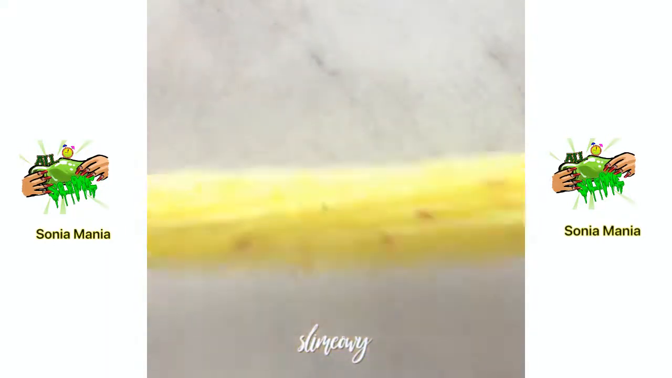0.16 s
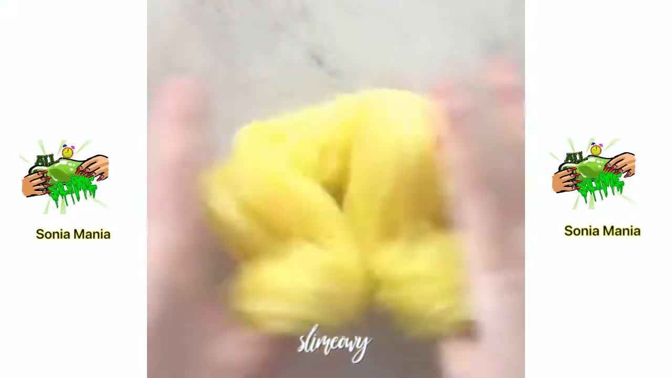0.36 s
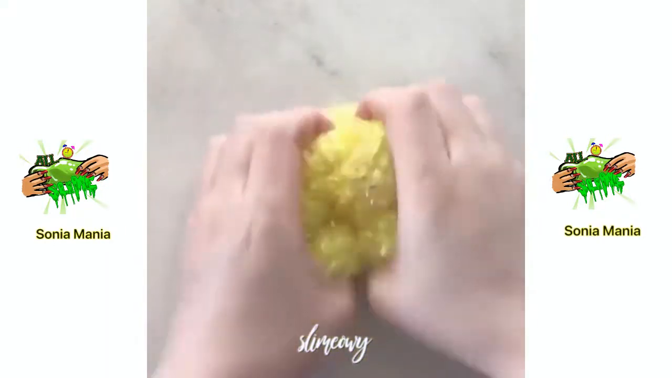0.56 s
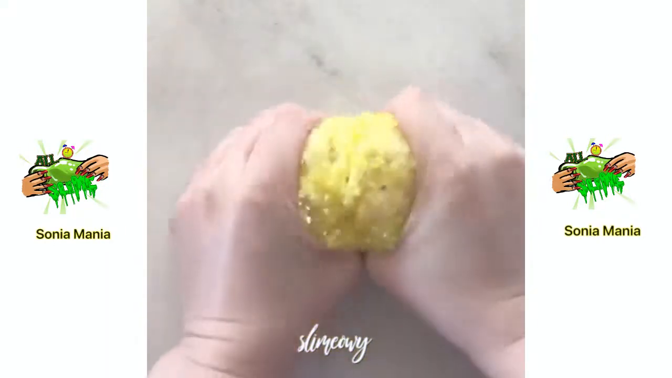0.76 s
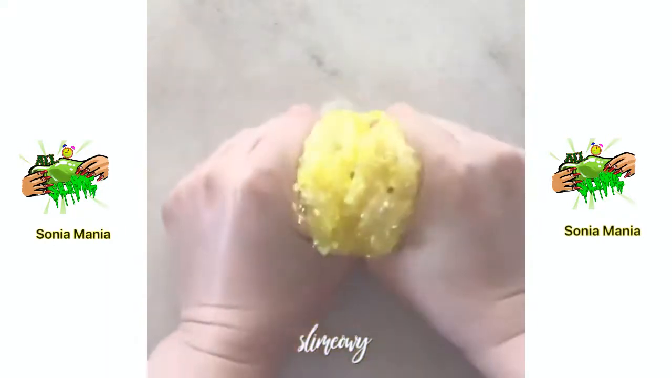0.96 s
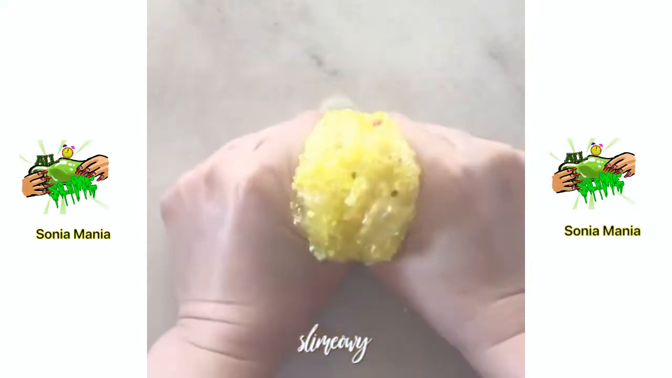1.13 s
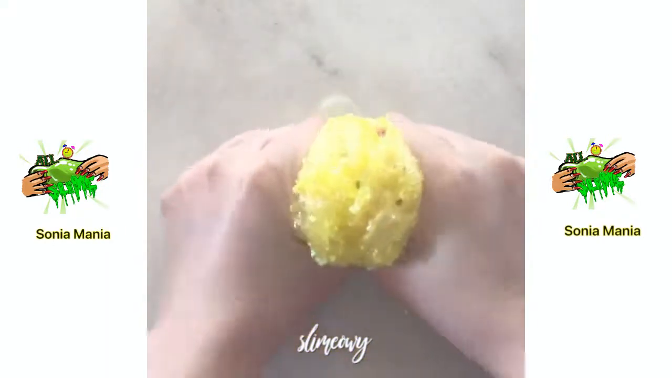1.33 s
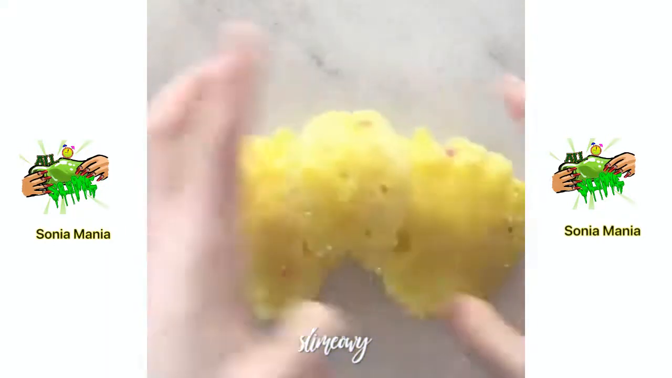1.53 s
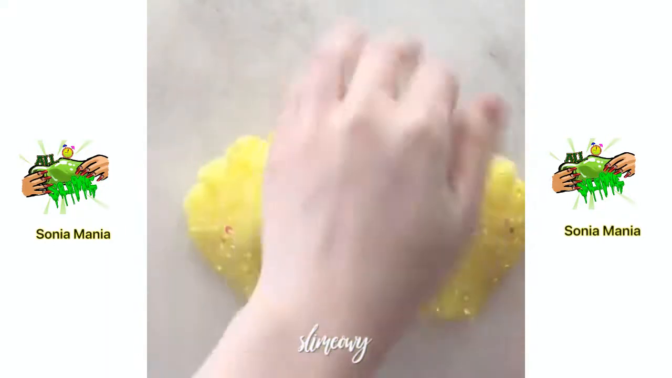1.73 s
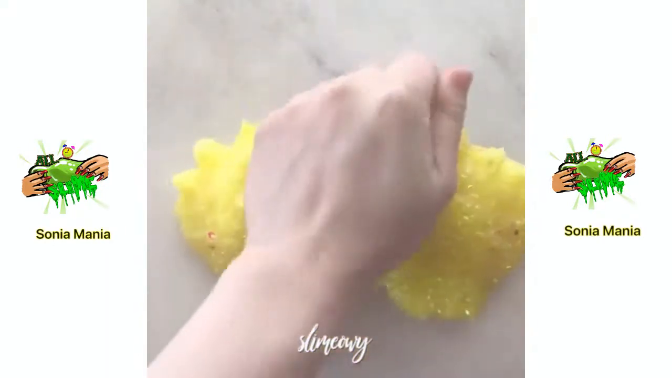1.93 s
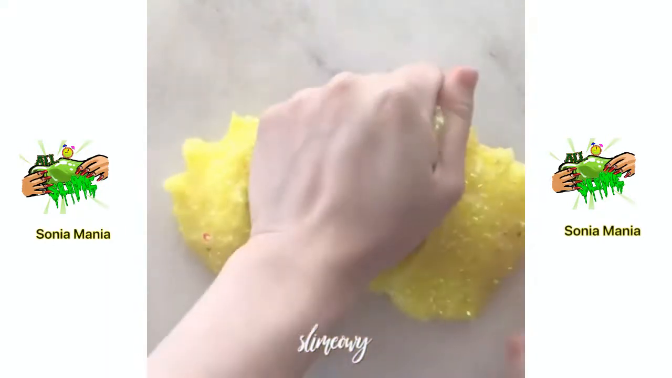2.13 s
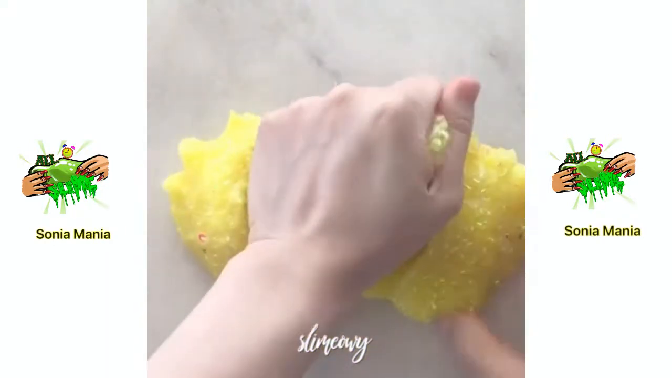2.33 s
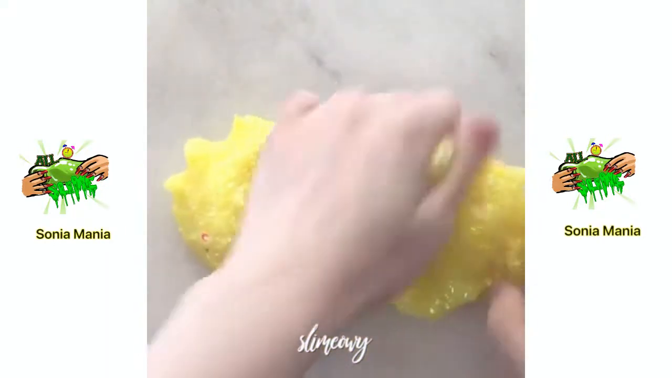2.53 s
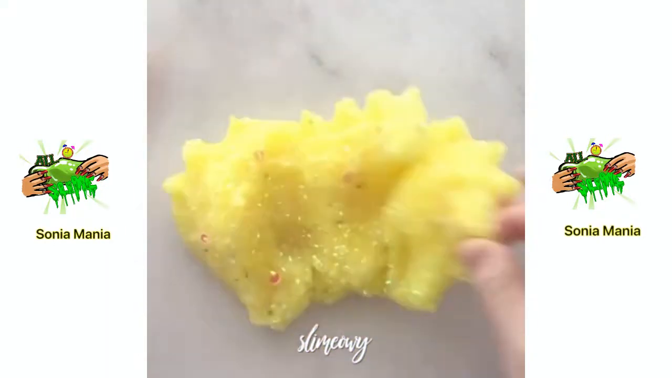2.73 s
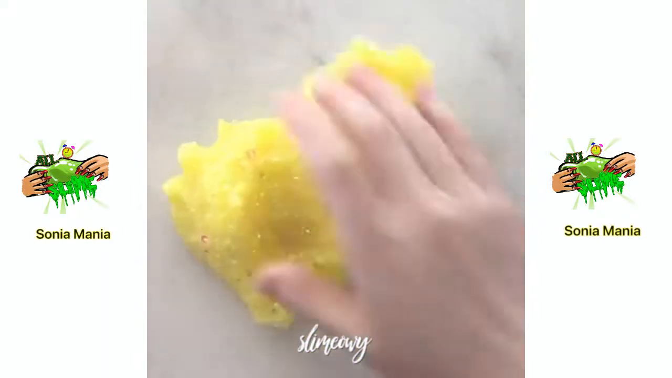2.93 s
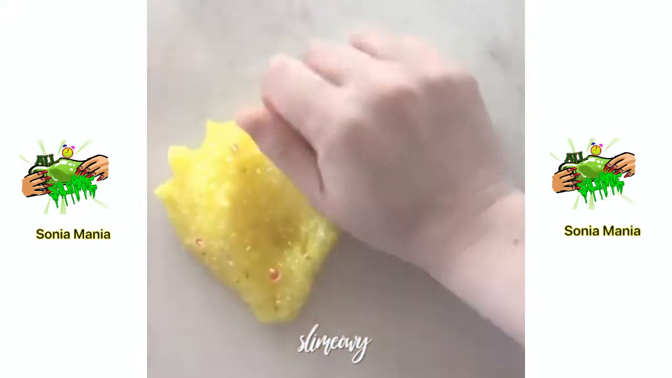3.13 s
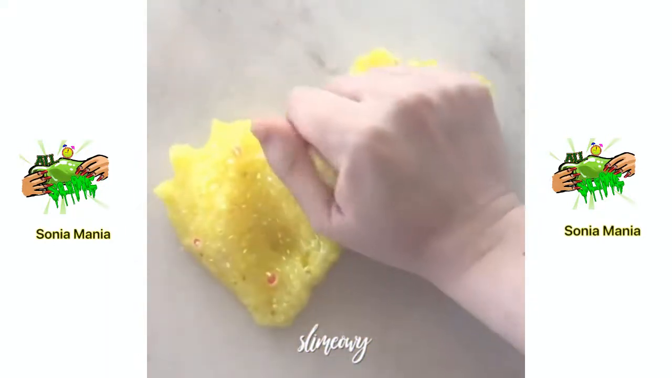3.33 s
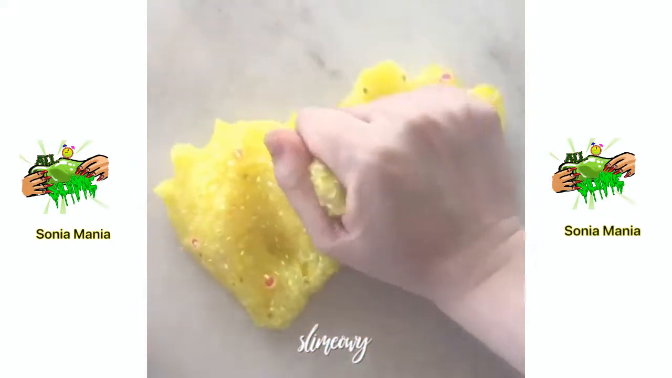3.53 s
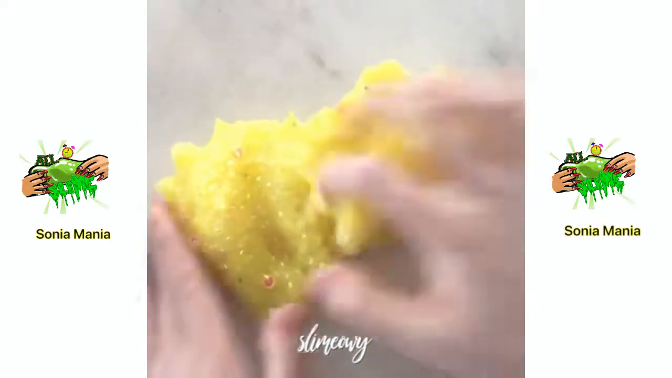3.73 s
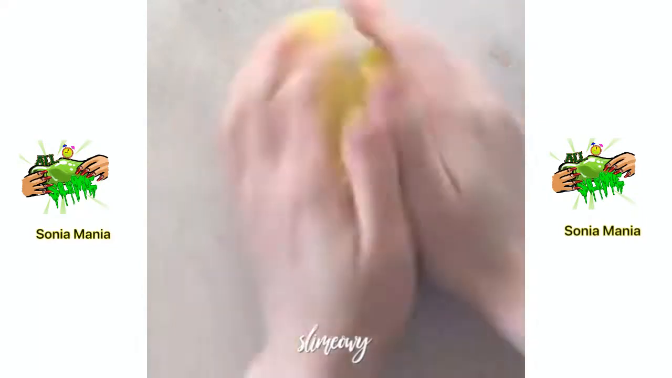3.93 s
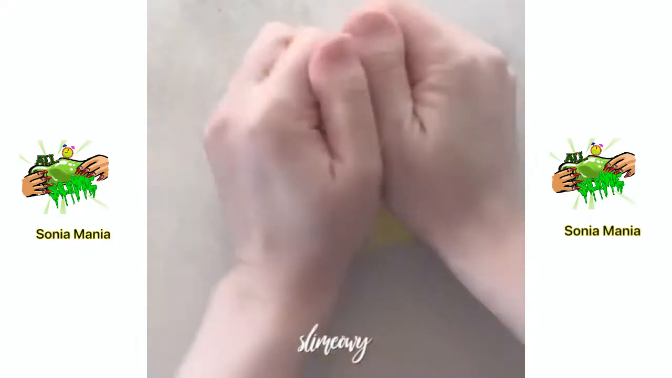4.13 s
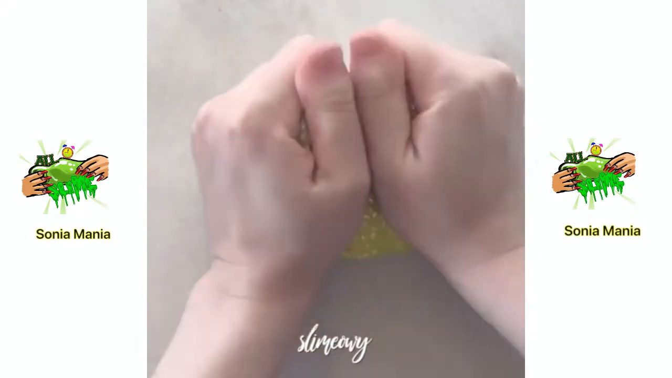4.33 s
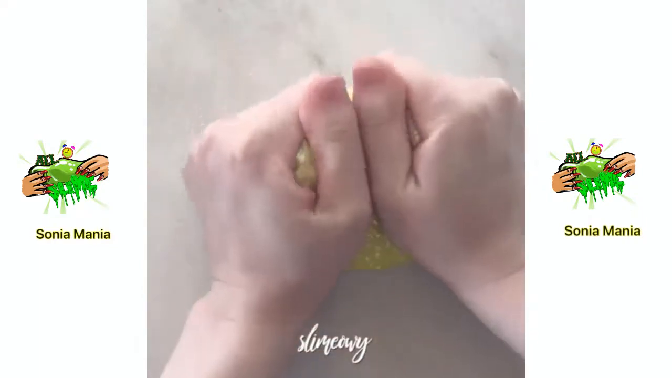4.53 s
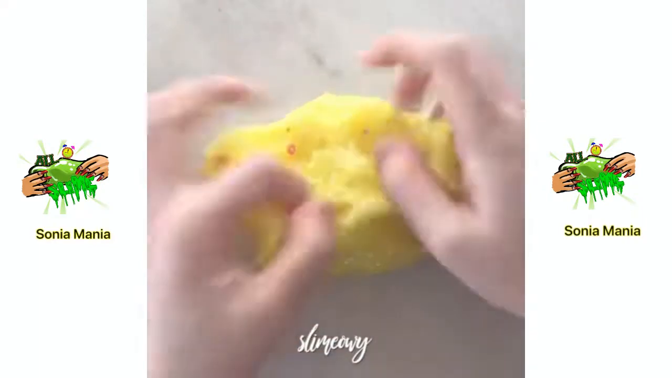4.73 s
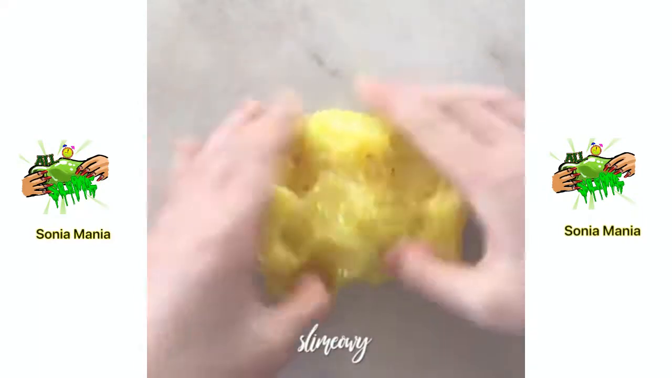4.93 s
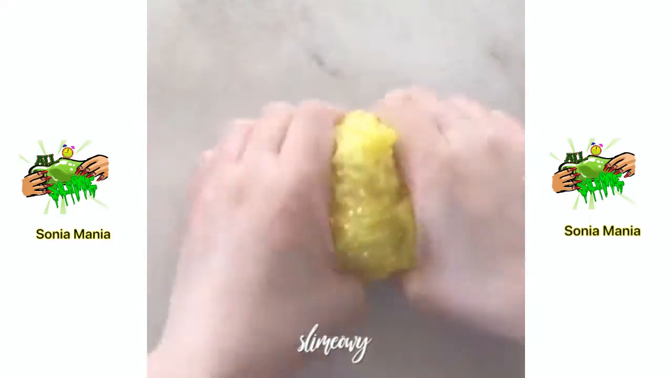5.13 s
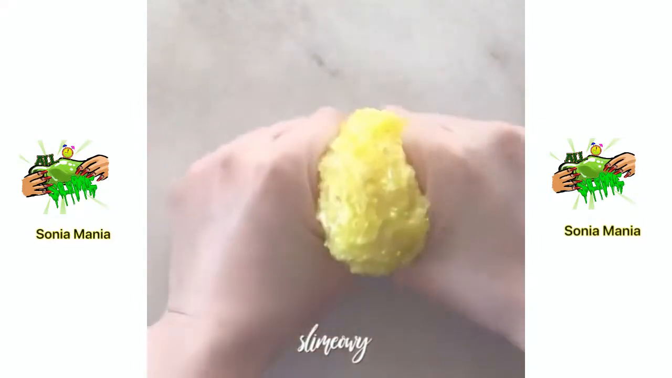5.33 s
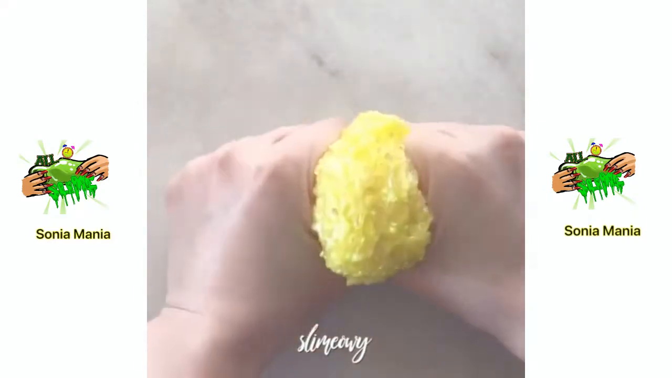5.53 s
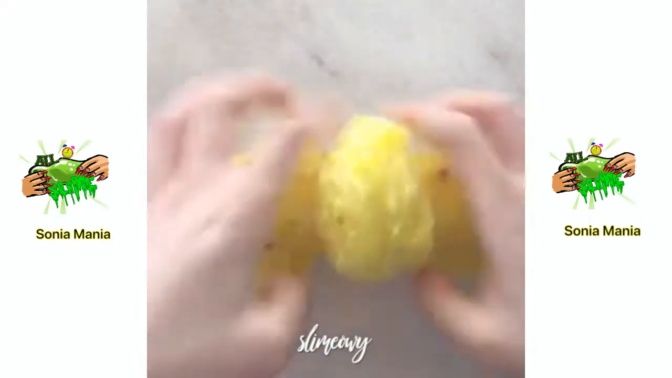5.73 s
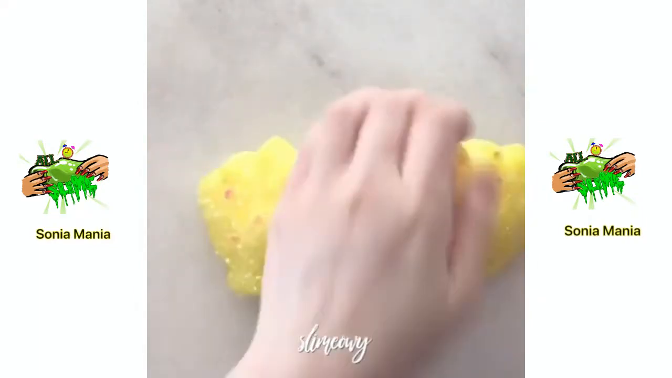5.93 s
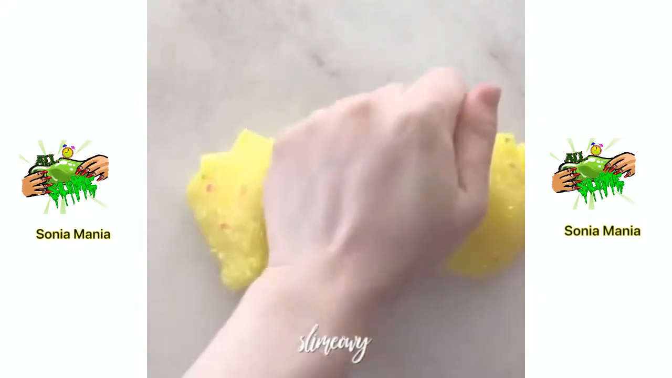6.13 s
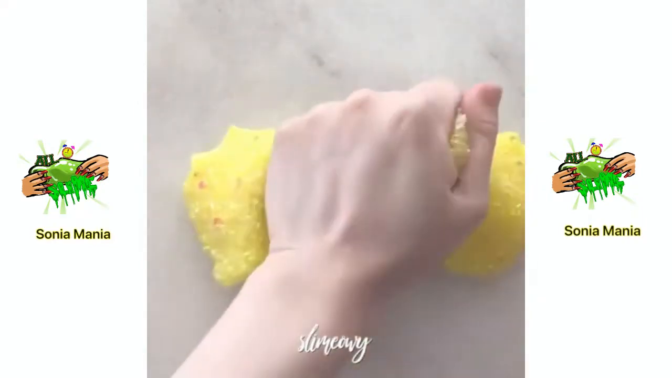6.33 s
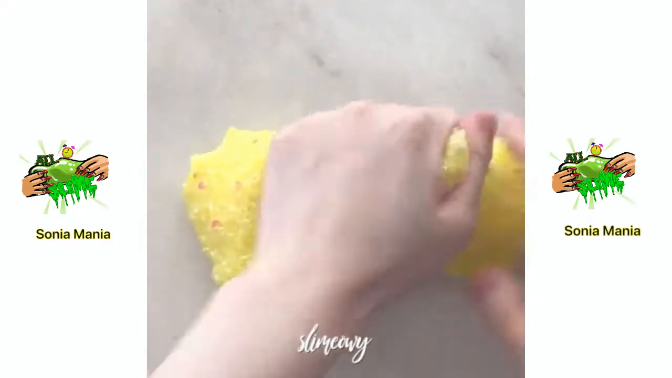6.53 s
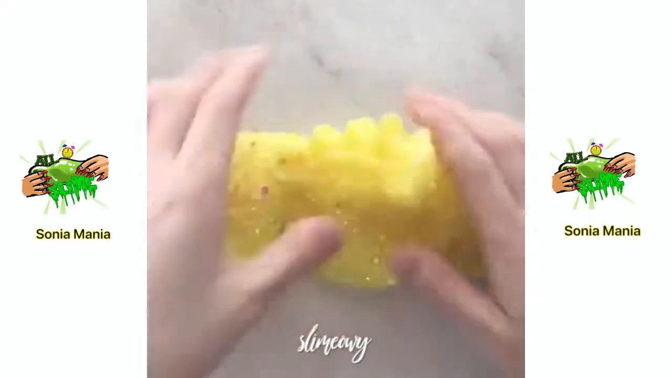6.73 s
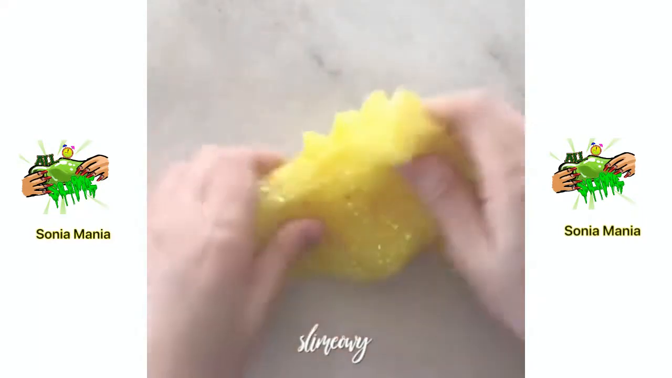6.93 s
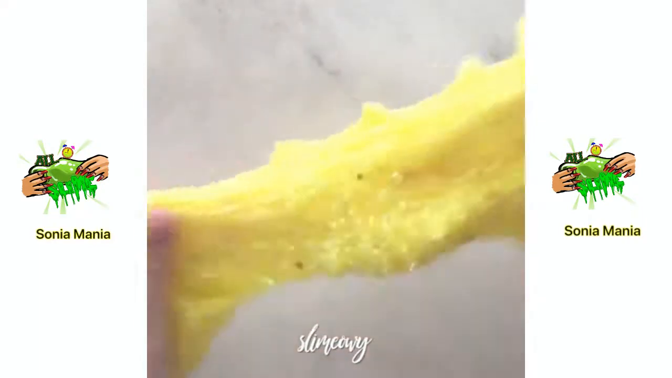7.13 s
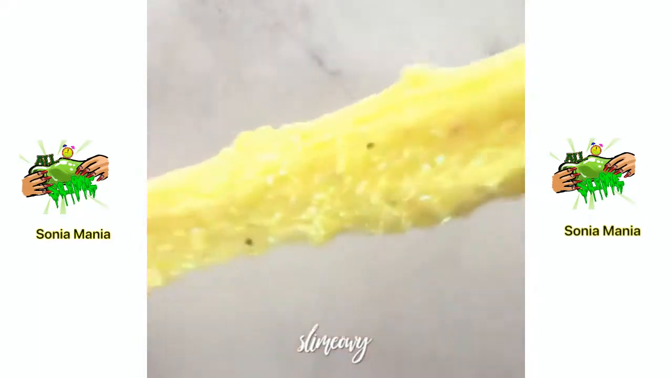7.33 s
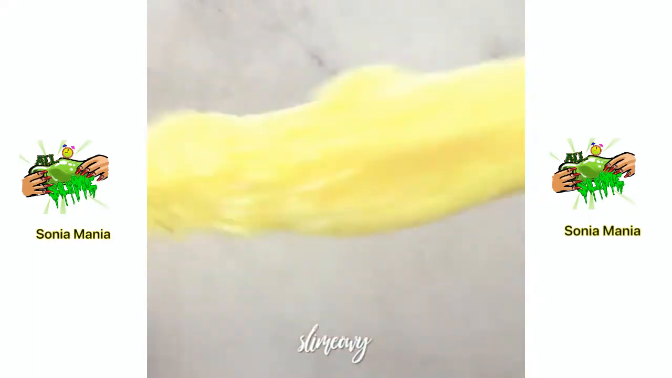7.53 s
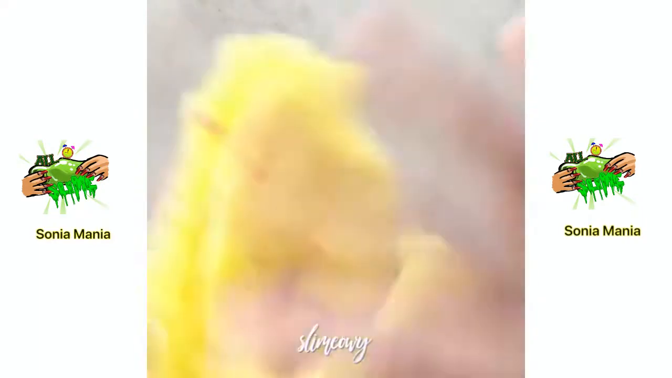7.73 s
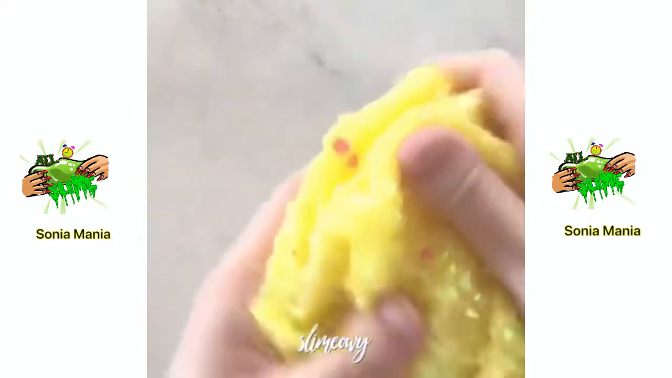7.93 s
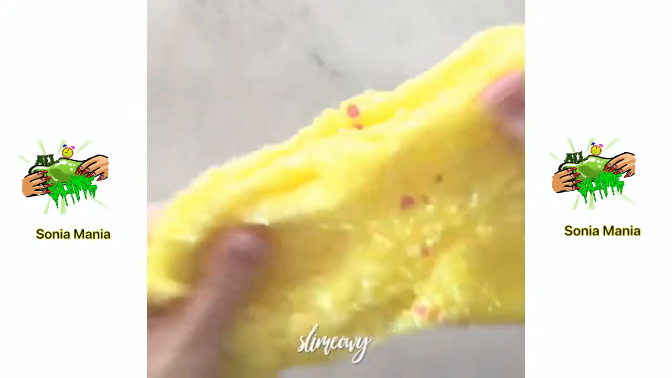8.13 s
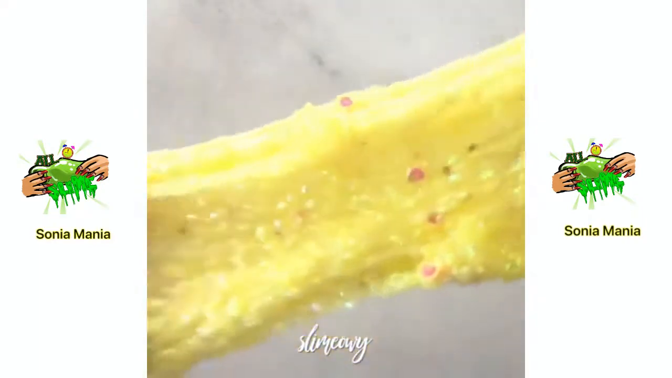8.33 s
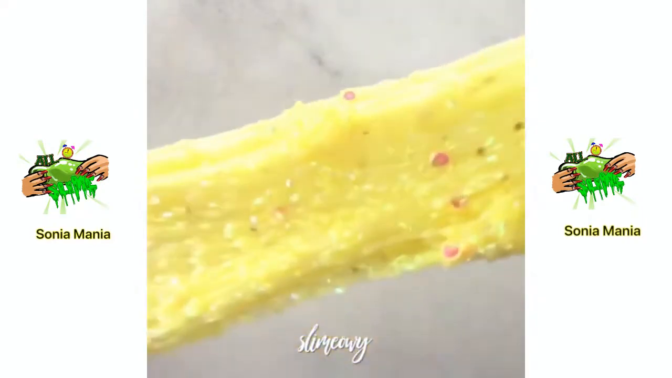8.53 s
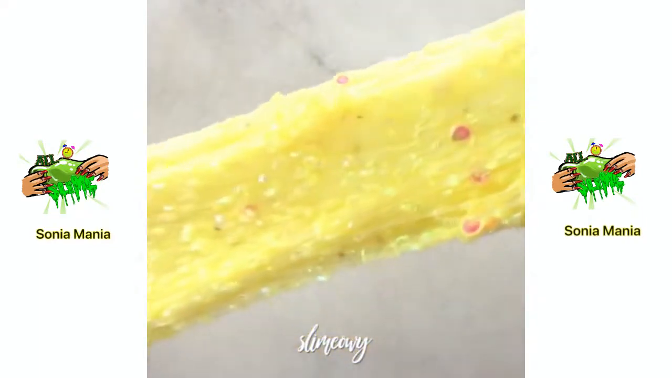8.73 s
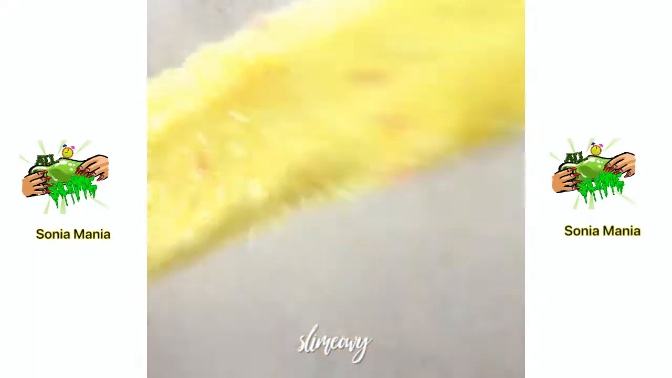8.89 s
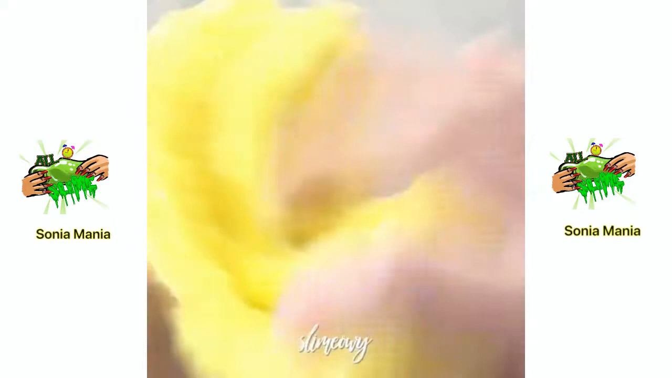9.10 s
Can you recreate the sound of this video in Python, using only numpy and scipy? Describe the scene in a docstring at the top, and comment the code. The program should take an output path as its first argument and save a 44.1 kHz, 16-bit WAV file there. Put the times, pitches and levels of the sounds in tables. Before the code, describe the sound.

Crunchy slime is handled on a table close to a phone microphone, with very faint traffic rumble and far engines humming. From 0 to 0.5 s a quiet pull gives a few soft pops. At about 0.6-1.4 s the first squeeze bursts into a dense volley of loud, sharp snaps and tiny rips over fine fizzing crackle, then thins. A wet sticky peel follows at 1.45 s with a barely audible squeak near 1.7 s. More squeezes crackle around 1.9-2.5, 3.1-3.6, 4.0-4.6, 5.1-5.6 and 6.0-6.5 s, irregular and bright, some pops fuller-bodied. Between them skin peels away with soft hiss, squelch and low hollow plops, notably near 2.6, 3.1, 5.75 and 7.07 s. A faint tiny chirp comes at 6.8 s. Two slow pulls at 7.1-7.5 and 8.1-8.9 s bring gentle fizz and sparse pops, ending in wet peeling near 9 s.

```python
"""Hands play with a crunchy slime on a table, close to a phone microphone, with far traffic and engines behind.
First comes a short pull with soft pops, then six squeezes up to about 6.6 s: trapped air pockets burst as
sharp snaps, some rip in a row, over a fine crackle made of tiny rings and noise. Between squeezes, sticky skin
peels off with a wet hiss and some hollow plops. A faint squeak, a gliding sine, comes at 1.7 s and a chirp
at 6.8 s. Two slow pulls from about 7.1 s, a few more pops and wet peeling finish the scene."""
import sys
import numpy as np
from scipy import signal
from scipy.fft import rfft, irfft, next_fast_len
from scipy.io import wavfile
from scipy.ndimage import uniform_filter1d, map_coordinates

SR = 44100
rng = np.random.default_rng(int(sys.argv[2]) if len(sys.argv) > 2 else 0)


def pcm_store(signal):
    """Save signal as 16-bit PCM."""
    levels = np.round(np.clip(np.atleast_2d(signal), -1, 1) * 32767)
    wavfile.write(sys.argv[1], SR, levels.astype(np.int16).T)


N = 403956  # length [samples]

# The clearest bursting pockets; a bigger pocket has more body:
# (time [s], crack level [dB], body against the crack [dB])
CLEAR_POPS = [(0.0394, -24.5, -7.5), (0.2558, -27, -6), (0.419, -44, 14.5), (0.482, -39, 6.5),
              (0.5236, -26, -0.5), (0.571, -38, 20.5), (0.618, -23, 5), (0.633, -22.5, 9.5),
              (0.672, -23, -3), (0.6885, -15, 6), (0.7104, -7.5, 9), (0.7369, -7, -1), (0.764, -11, -17),
              (0.7788, -2, -29), (0.795, 2, -26), (0.807, -9, 0.5), (0.8213, -5, -15), (0.8273, 1, -4.5),
              (0.849, 1.5, -13), (0.858, -5.5, -22), (0.872, -12, -5.5), (0.9039, -0.5, -14),
              (0.9077, -6, -16), (0.924, 3, -31.5), (0.93, -3.5, -5), (0.943, -10, -15), (0.9609, 1, -15.5),
              (0.972, -0.5, -30), (0.978, -16, 4), (1.0064, -9, -22), (1.0547, -10.5, -26.5),
              (1.115, -13, -18), (1.172, -17, -5), (1.206, -19.5, 2), (1.246, -19, -27.5),
              (1.2727, -11.5, -10), (1.32, -13.5, -14), (1.41, -25, -18), (1.873, -26.5, 3.5),
              (1.913, -25, 4.5), (1.9436, -3.5, -10), (1.952, -17, 16), (1.983, 1, -10), (1.998, -11, 12.5),
              (2.026, -10, -17), (2.038, -13.5, 11), (2.058, -11, -10), (2.09, -15.5, 8.5),
              (2.1025, -12, -15), (2.1608, -4, -11), (2.191, -1, -18), (2.202, -15, 6), (2.271, -3, -16),
              (2.2842, -13, -5), (2.317, -4.5, -9), (2.3669, -11, -30), (2.394, -16, -5.5),
              (2.4618, -28.5, 3.5), (2.5235, -20.5, -3.5), (2.579, -28, 7), (2.68, -20.5, -8),
              (3.0024, -42.5, 18), (3.0492, -28, 17), (3.1142, -25.5, 14.5), (3.229, -2.5, -9.5),
              (3.2539, 1.5, -40), (3.305, -11, -15), (3.331, -13, -8), (3.3452, -10, -11),
              (3.377, -8.5, -18), (3.435, -18.5, -24), (3.473, -12, -25), (3.503, -13, -13),
              (3.519, -12.5, -16), (3.55, -21, -14), (3.593, -16, -7.5), (3.738, -19.5, -3),
              (3.8384, -14.5, 4), (4.0529, -22, -8), (4.137, -17, -3.5), (4.197, -21, 5.5),
              (4.2409, 1.5, -11), (4.2565, -10, -7), (4.2864, -10, -8), (4.313, -10, -20),
              (4.352, -11.5, -3), (4.3609, -6, -27), (4.3683, -2.5, -13.5), (4.374, -7, -23),
              (4.388, 1, -37), (4.413, -16, -20), (4.4722, -3.5, -38), (4.5253, -4.5, -5),
              (4.5636, -6.5, -23), (4.6, -8, -10), (4.605, -19, 6), (5.1349, -7.5, -10.5),
              (5.1534, -9.5, -24), (5.178, -12, -33), (5.1926, -7.5, -23), (5.232, -18.5, 0.5),
              (5.291, -14, -9), (5.3141, -12, -2), (5.3955, -4, -10), (5.481, -14.5, -24),
              (5.535, -5.5, -20), (5.595, -13, -9.5), (5.672, -36, 2), (5.724, -36, 9), (5.953, -27, -17),
              (6.013, -27, -37), (6.03, -29, 2), (6.0663, -9, -6), (6.193, -3, -11), (6.2526, -7.5, -6),
              (6.2719, -7, -16), (6.2783, -19, 5.5), (6.285, -7.5, -14), (6.3056, -14, -18),
              (6.3273, -11.5, -3), (6.3837, -3.5, -9), (6.4186, -16.5, -2.5), (6.432, -7.5, -16),
              (6.4593, -9, -10), (6.5361, -27.5, 13.5), (6.987, -22.5, 3.5), (7.0105, -15.5, -11),
              (7.12, -19, -18), (7.214, -17.5, -23), (7.275, -16, -9), (7.4252, -25, -30),
              (7.7383, -17, -41), (7.942, -30.5, -16), (7.9817, -38, 12), (8.046, -27.5, -5),
              (8.22, -19.5, -1), (8.2548, -38, 15.5), (8.266, -17.5, -11), (8.3251, -18, -14),
              (8.3566, -27, 0), (8.4732, -18, -8), (8.532, -24.5, -25), (8.633, -17, -32),
              (8.6482, -13, -7), (8.754, -25.5, -3)]
# Crack, body and thud of a middling pocket, before its size shifts them: (centre [Hz], width [Hz])
POP_BANDS = [(5970, 13600), (1930, 5030), (380, 500)]
# Seams of pockets ripping open: (loudest time [s], time to fade by 20 dB [s], level then [dB], centre [Hz])
SEAM_RIPS = [(0.724, .022, -17, 6500), (0.8042, .015, -14, 7300), (0.861, .015, -21, 8000),
             (2.0155, .008, -13, 6000), (2.0935, .008, -14, 6000), (4.327, .016, -24, 7500),
             (4.438, .03, -27, 9000), (4.604, .025, -25, 8550), (5.274, .013, -27, 5000),
             (5.3147, .015, -25, 8060), (5.34, .012, -25, 7980), (5.398, .015, -17.5, 7500),
             (6.336, .013, -25, 8600), (8.389, .014, -30, 7360)]
# Wet suction letting go: (time [s], rough peak level [dB], pitch [Hz])
SUCTION_PLOPS = [(2.607, -31, 314), (3.048, -30, 390), (3.109, -30, 286), (3.222, -32, 450),
                 (3.925, -36, 404.5), (5.73, -35, 340), (5.767, -24.5, 677), (6.78, -44, 250),
                 (6.941, -34.5, 455), (7.07, -27.5, 504), (7.647, -36, 638)]
# Each squeeze of the fists, its pressure given as the level of its fizz: (time [s], level [dB])
FIST_SQUEEZES = [
    [(0.49, -63.5), (0.6, -39), (0.7, -27), (0.76, -28.5), (0.814, -23.5), (0.864, -27.5), (0.994, -32),
     (1.05, -36), (1.36, -46), (1.38, -62.5)],
    [(1.83, -65), (1.912, -40), (2.044, -21), (2.092, -26), (2.136, -28.5), (2.196, -36), (2.352, -42.5),
     (2.46, -50.5)],
    [(3.03, -55.5), (3.1, -43), (3.202, -32), (3.254, -30.5), (3.332, -33), (3.504, -48), (3.66, -46)],
    [(3.9, -50), (4.084, -38.5), (4.37, -30.5), (4.45, -33), (4.5, -41), (4.57, -31.5), (4.66, -47.5)],
    [(4.97, -61.5), (5.108, -40.5), (5.16, -35), (5.266, -32.5), (5.308, -28), (5.372, -33), (5.424, -36),
     (5.538, -35), (5.65, -51.5)],
    [(5.93, -88), (6.046, -49.5), (6.184, -32), (6.236, -37.5), (6.29, -33), (6.346, -34.5), (6.442, -38),
     (6.58, -56.5)],
]
# Each slow pull of the strand, its tension given as the level of its fizz: (time [s], level [dB])
STRAND_PULLS = [
    [(0.0, -59), (0.16, -59), (0.2, -61), (0.3, -59.5), (0.34, -50.5), (0.49, -58)],
    [(7.13, -46.5), (7.154, -50), (7.342, -49), (7.54, -60.5)],
    [(8.1, -56), (8.22, -47.5), (8.362, -47), (8.554, -52), (8.766, -49.5), (8.92, -64)],
]
# Skin or table peeling off the slime; rise and fall each span 20 dB:
# (start of hold [s], rise [s], hold [s], fall [s], hiss level [dB], squelch level [dB])
SKIN_PEELS = [(1.435, 0.056, 0.098, 0.032, -38.5, -36.5), (2.624, 0.25, 0.0038, 0.36, -39.5, -41.5),
              (2.94, 0.041, 0.013, 0.088, -45.5, -46), (3.722, 0.08, 0.099, 0.14, -42.5, -44),
              (3.902, 0.039, 0.24, 0.44, -58, -45.5), (4.746, 0.25, 0.12, 0.092, -39.5, -44),
              (5.734, 0.077, 0.083, 0.033, -40, -38.5), (6.616, 0.037, 0.12, 0.062, -42.5, -43.5),
              (6.954, 0.12, 0.084, .15, -41, -44.5), (7.067, 0.066, 0.016, 0.031, -34, -37.5),
              (7.62, 0.13, 0.0031, 0.19, -39.5, -45), (7.833, 0.049, 0.019, 0.24, -46.5, -48.5),
              (8.059, 0.047, 0.011, 0.2, -44, -50.5), (8.963, 0.042, 0.026, 0.11, -34, -41.5),
              (9.15, 0.28, .02, .1, -46.5, -48)]
# Wetness of the mass, added to thud and squelch: (time [s], wetness [dB])
WETNESS = [(0, 1), (1, 1.5), (2.1, -0.5), (3.2, -4.5), (4, -3), (5.3, -4.5), (6.3, -1.5), (7.5, -3.5),
           (9.16, 2)]
# Tone colour of the fizz, the squelch and the traffic rumble: (frequency [Hz], relative level [dB])
FIZZ_COLOUR = [(530, -39.5), (900, -18), (1140, -11.5), (1500, -12.5), (4310, -7.5), (6080, -4.5),
               (9070, -5), (11300, -6.5), (12800, -8.5), (16600, -57.5), (22000, -120)]
SQUELCH_COLOUR = [(150, -22), (250, -3), (665, -11), (843, -12), (1210, -7.5), (2160, -8.5), (5000, -12.5),
                  (6500, -56), (11000, -120)]
RUMBLE_COLOUR = [(15, -53), (25, -20), (97, -8), (197, -16.5), (230, -24), (291, -21), (477, -34.5),
                 (5000, -47), (9120, -51), (12800, -59.5), (16600, -91), (22000, -120)]
# Loudness of the traffic rumble: (time [s], level [dB])
TRAFFIC_LEVEL = [(0.0, -54), (9.16, -58.5)]
# Far engines, before a slight waver: (time [s], firing rate [Hz], level [dB], level of the octave [dB])
FAR_ENGINES = [
    [(0, 101.3, -61.5, -69), (1, 104, -54.5, -68.5), (2.3, 96.75, -67, -63), (2.6, 91, -91, -92)],
    [(.2, 119.5, -95, -101), (.5, 121.7, -66.5, -78), (1.4, 139.6, -54.5, -57.5), (2.1, 150.2, -69, -107),
     (2.4, 147.5, -88, -86)],
    [(2.5, 86, -95, -75), (2.6, 86.6, -68, -46.5), (3.1, 95.8, -52, -58), (3.85, 104.4, -64, -59.5),
     (4.1, 109, -99, -80)],
    [(4.2, 84.8, -68, -69), (4.75, 82.5, -49, -58.5), (5.2, 85.7, -64.5, -64.5), (8.5, 87.1, -63.5, -81),
     (9.16, 84, -97, -83)],
]
# A faint gliding chirp and squeak, before a slight waver: (time [s], pitch [Hz], level [dB])
CHIRP_GLIDE = [(6.785, 5720, -64), (6.81, 5600, -52), (6.83, 5540, -62)]
SQUEAK_GLIDE = [(1.63, 2400, -82), (1.67, 2480, -71), (1.73, 2300, -82)]

CRACK_DB_PER_OCTAVE = 59  # a small pocket cracks higher: one octave for this much less body
BODY_DB_PER_OCTAVE = 44  # a bigger pocket sounds lower: one octave for this much more body
THUD_DB, THUD_PER_BODY = -25.5, 0.64  # thud against the crack at no body or wetness; its growth with body
THUD_CUT_HZ = 200  # a pocket is too small to sound strongly below this
TEAR_DB, TEAR_T60_S = -3, 0.017  # energy of the tearing skin against the snap; time to decay by 60 dB
LESSER_PER_S = 18  # how many random lesser pops
LESSER_DB, LESSER_BODY_DB = 11, -10  # their middle crack over the effort; middle body against the crack
RIP_RISE_S = 0.003  # a rip swells by 20 dB in this time
PLOP_T60_CYCLES, PLOP_ATTACK_S = 12.2, 0.0026  # cycles to decay by 60 dB; time of the soft start
# Squelch against the fizz of a squeeze, before wetness: at first, its change, its lowest
WET_DB, DRIES_DB_PER_S, DRIEST_DB = 5, -56, -10.5
PULL_WET_DB = -5  # squelch against the fizz of a pull
LET_GO_S = 0.01  # a grip starts and ends by 20 dB in this time
# Steady faint room hiss, high and low part, always present under the handling
ROOM_HIGH_DB, ROOM_LOW_DB = -78.5, -70.5
SHEEN_HZ, SHEEN_PER_WETNESS = 8000, -0.16  # drier slime fizzes brighter above this: dB per dB of wetness
TOP_HZ = 13076  # nothing is heard above this


def pops():
    """Each pocket wall snaps once, then its thin skin tears in smaller ticks for a few milliseconds."""
    t, out = np.arange(1024) / SR, np.zeros(N + 1024)
    hz = np.fft.rfftfreq(2048, 1 / SR)
    wetness_db = curves(WETNESS)[0]
    for start, crack_db, body_db in CLEAR_POPS + lesser_pops():
        # no two pockets have the same shape
        tune = np.exp(rng.standard_normal(3) * [.15, .2, .1])
        tune[0] *= 2 ** (-body_db / CRACK_DB_PER_OCTAVE)
        tune[1] *= 2 ** (-body_db / BODY_DB_PER_OCTAVE)
        shapes = [band_pass(hz, centre * k, width) for (centre, width), k in zip(POP_BANDS, tune)]
        shapes[2] = shapes[2] * (1j * hz / (THUD_CUT_HZ + 1j * hz)) ** 2
        # bring all three to the same peak
        crack, body, thud = [h / np.abs(irfft(h)).max() * np.sqrt(2) for h in shapes]

        ticks = rng.standard_normal(len(t)) * rng.standard_normal(len(t))
        ticks = ticks * (t > .0002) * amp(-60 * t / TEAR_T60_S)
        tear = rfft(ticks / np.linalg.norm(ticks) * amp(TEAR_DB), 2048)

        at = round(start * SR)
        thud_db = THUD_DB + THUD_PER_BODY * body_db + wetness_db[at]
        low = amp(body_db) * (1 + 0.9 * tear) * body + amp(thud_db) * thud
        burst = irfft((1 + tear) * crack + low)[:len(t)]
        out[at:][:len(t)] += amp(crack_db) * burst
    return out[:N]


def lesser_pops():
    """Pockets that burst at random, as loud as the effort of the squeeze or pull allows."""
    draw = rng.random((int(LESSER_PER_S * N / SR), 3))
    effort_db = np.max([grip(rows) for rows in FIST_SQUEEZES + STRAND_PULLS], axis=0)
    at = (draw[:, 0] * N).astype(int)
    crack_db = effort_db[at] + LESSER_DB + 8 * (draw[:, 1] - .5)
    body_db = LESSER_BODY_DB + 14 * (draw[:, 2] - .5)
    return list(zip(at / SR, crack_db, body_db))


def rips():
    """A seam opens in a dense run of ticks, as wide in pitch as a crack: it swells fast and fades."""
    t = np.arange(2048) / SR - 2 * RIP_RISE_S
    out, hz = np.zeros(N + 2048), np.fft.rfftfreq(2048, 1 / SR)
    for loudest, fade, db, centre_hz in SEAM_RIPS:
        ticks = rng.standard_normal(len(t)) * (1 + np.abs(rng.standard_normal(len(t))))
        coloured_ticks = unit(irfft(rfft(ticks) * band_pass(hz, centre_hz, POP_BANDS[0][1])))
        shape_db = -20 * np.maximum(-t / RIP_RISE_S, t / fade)
        out[round((loudest + t[0]) * SR):][:len(t)] += amp(db + shape_db) * coloured_ticks
    return out[:N]


def kneading():
    """Tiny pockets fizz in uneven clusters, the wet mass squelches lower and smoother; room hiss lies under."""
    fizz_db, squelch_db, peeling = hands()
    crunch = np.clip(1 - 0.25 * peeling, .1, 1)  # peeling crackles less and hisses more
    clusters = amp(crunch * (2.1 * wobble(30) + 1.94 * wobble(120)))

    bright = 0.56 * crunch * grains(per_s=655, centre_hz=6050, spread_db=2.5, cycles=0.87)
    bright += (0.9 - 0.23 * crunch) * patchy(depth_db=4.5)
    bright += 0.75 * crunch * crackles(per_s=110, life_s=0.0025)
    fizz = coloured(clusters * bright, FIZZ_COLOUR)
    top = filtered(fizz, lambda hz: 1 / (1 + (SHEEN_HZ / (hz + 1)) ** 4))
    fizz = fizz + (amp(SHEEN_PER_WETNESS * curves(WETNESS)[0]) - 1) * top

    wet = 0.5 * grains(per_s=650, centre_hz=1400, spread_db=4.5, cycles=1.8) + 0.85 * patchy(depth_db=3)
    squelch = coloured(clusters * wet, SQUELCH_COLOUR)
    return amp(fizz_db) * fizz + amp(squelch_db) * squelch


def hands():
    """Fizz and squelch [dB] and the share of peeling: a squeeze dries out, a pull stays damp, a peel swells."""
    t = np.arange(N) / SR
    # the room hiss and the separate actions add up as powers
    fizz, squelch = amp(ROOM_HIGH_DB) ** 2, amp(ROOM_LOW_DB) ** 2
    for rows in FIST_SQUEEZES:
        wet_db = np.clip(WET_DB + DRIES_DB_PER_S * (t - rows[0][0]), DRIEST_DB, WET_DB)
        wet_db = wet_db + curves(WETNESS)[0]
        fizz = fizz + amp(grip(rows)) ** 2
        squelch = squelch + amp(grip(rows) + wet_db) ** 2
    for rows in STRAND_PULLS:
        fizz = fizz + amp(grip(rows)) ** 2
        squelch = squelch + amp(grip(rows) + PULL_WET_DB) ** 2
    without_peels = fizz
    for start, rise, hold, fall, hiss_db, squelch_db in SKIN_PEELS:
        shape_db = -20 * np.maximum(np.maximum((start - t) / rise, (t - start - hold) / fall), 0)
        fizz = fizz + amp(hiss_db + shape_db) ** 2
        squelch = squelch + amp(squelch_db + shape_db) ** 2
    return 10 * np.log10(fizz), 10 * np.log10(squelch), 1 - without_peels / fizz


def grip(rows):
    """A hand's effort in dB along its rows, fading quickly outside them."""
    t = np.arange(N) / SR
    outside_s = np.maximum(np.maximum(rows[0][0] - t, t - rows[-1][0]), 0)
    return curves(rows)[0] - 20 * outside_s / LET_GO_S


def grains(per_s, centre_hz, spread_db, cycles):
    """Random tiny bursts, many small and few large: each a short damped ring at its own pitch."""
    draw, t = rng.random((int(per_s * N / SR), 3)), np.arange(96)
    size = amp(spread_db * np.minimum(-np.log(draw[:, 1:2] + 1e-9), 2.5))
    pitch_hz = np.clip(centre_hz * 2 ** (2.56 * (draw[:, 2:] - .5)), 200, 11500)
    turn = pitch_hz / SR * t  # cycles since the start of the ring
    rings = size * np.sin(2 * np.pi * turn) * np.exp(-turn / cycles)
    at = (draw[:, :1] * N).astype(int) + t
    return unit(np.bincount(at.ravel(), rings.ravel(), N + len(t))[:N])


def crackles(per_s, life_s):
    """Middle-sized pockets bursting at random: broad ticks of uneven size with a short noisy tail."""
    draw = rng.random((2, N))
    hits = (draw[0] < per_s / SR) * draw[1] ** 2
    fade = signal.lfilter([1], [1, -np.exp(-1 / (life_s * SR))], hits)
    return unit(fade * rng.standard_normal(N))


def patchy(depth_db):
    """Noise whose colour shifts in soft patches of time and pitch."""
    z = signal.stft(rng.standard_normal(N), nperseg=512)[2]
    field = uniform_filter1d(rng.standard_normal(z.shape), size=7, axis=0)
    field = uniform_filter1d(field, size=5, axis=1)
    return unit(signal.istft(z * amp(depth_db * unit(field)), nperseg=512)[1][:N])


def plops():
    """A hollow low ring with a soft start where the mass lets go of skin or table."""
    t, out = np.arange(4096) / SR, np.zeros(N + 4096)
    for start, db, hz in SUCTION_PLOPS:
        decay = amp(db - 60 * t * hz / PLOP_T60_CYCLES)
        soft_start = 1 - np.exp(-t / PLOP_ATTACK_S)
        # the 2 makes up for what the soft start takes away
        out[round(start * SR):][:len(t)] += decay * soft_start * 2 * np.sin(2 * np.pi * hz * t)
    return out[:N]


def engines():
    """Far engines changing speed: each firing rate is a gliding tone with its octave."""
    return sum(tone(rows, waver=0.009) for rows in FAR_ENGINES)


def chirp_and_squeak():
    """Two faint, short gliding tones."""
    return tone(CHIRP_GLIDE, waver=0.002) + tone(SQUEAK_GLIDE, waver=0.002)


def traffic():
    """Distant rumble: low coloured noise that slowly gets quieter."""
    return amp(curves(TRAFFIC_LEVEL)[0]) * coloured(rng.standard_normal(N), RUMBLE_COLOUR)


def tone(rows, waver):
    """A gliding, slightly unsteady sine, with its octave if the rows give one, silent outside its rows."""
    hz, *levels_db = curves(rows)
    t = np.arange(N) / SR
    phase = 2 * np.pi * np.cumsum(hz * (1 + waver * wobble(6.9))) / SR
    swell = (t > rows[0][0]) * (t < rows[-1][0]) * amp(2.5 * wobble(6))
    return swell * sum(amp(db) * np.sin((k + 1) * phase) for k, db in enumerate(levels_db))


def amp(db):
    """Decibels to a plain factor."""
    return 10 ** (np.asarray(db) / 20)


def unit(x):
    """x brought to an average (rms) level of 1."""
    return x / np.sqrt(np.mean(x ** 2) + 1e-20)


def curves(rows):
    """One value per sample for each column after the time."""
    s, *cols = np.transpose(rows)
    return [np.interp(np.arange(N) / SR, s, c) for c in cols]


def wobble(rate):
    """A smooth random curve, rate knots a second."""
    return map_coordinates(rng.standard_normal(int(N * rate / SR) + 4), [np.arange(N) * rate / SR])


def band_pass(hz, centre, width):
    """Response of two equal resonances in a row: strongest at the centre, weaker on both sides."""
    return (1j * hz * width / (centre ** 2 - hz * hz + 1j * hz * width)) ** 2


def filtered(x, response):
    """x through a filter given as a response (real or complex) of frequency."""
    m = next_fast_len(N + SR // 2)
    return irfft(rfft(x, m) * response(np.fft.rfftfreq(m, 1 / SR)), m)[:N]


def coloured(x, points):
    """x through a spectrum of (frequency [Hz], level [dB]) points, brought to rms 1."""
    f, db = np.transpose(points)
    return unit(filtered(x, lambda hz: amp(np.interp(np.log(hz + 1), np.log(f + 1), db))))


def scene():
    """The slime up close, with the far outdoors behind it."""
    slime = pops() + rips() + plops() + kneading()
    return (slime + engines() + chirp_and_squeak() + traffic())[None]


def record(dry):
    """The phone's bass filters delay the low part of each pop; the loudest snaps clip; the top rolls off."""
    lag = lambda hz: np.exp(2j * np.pi * 1700 / (hz + 330))
    roll = lambda hz: amp(-32 * np.clip((hz - 11600) / 1000, 0, None))  # 32 dB per 1000 Hz
    bass_cut = lambda hz: hz ** 2 / (hz ** 2 + 25 ** 2)
    clipped = np.clip(filtered(dry[0], lag), -.9, .9)
    return filtered(clipped, lambda hz: roll(hz) * bass_cut(hz) * (hz < TOP_HZ))[None]


dry = scene()
out = record(dry)
pcm_store(out)
```